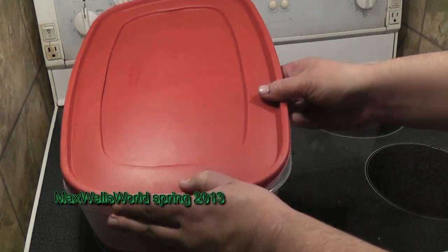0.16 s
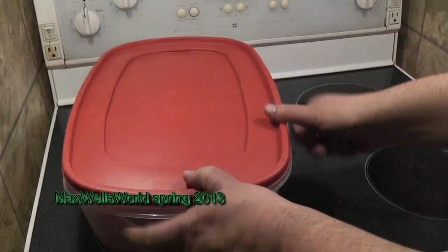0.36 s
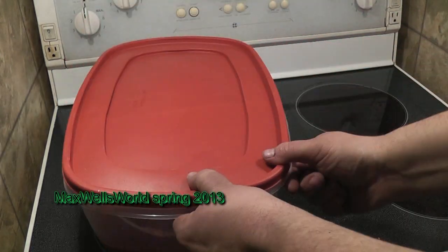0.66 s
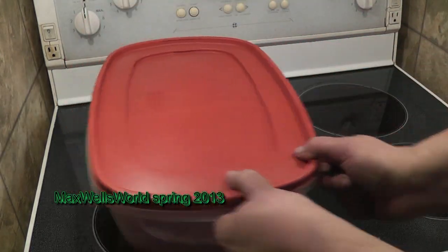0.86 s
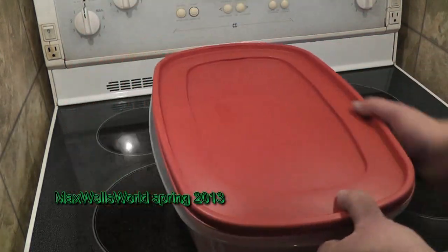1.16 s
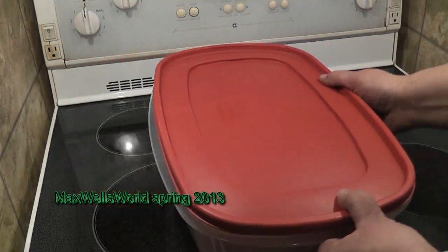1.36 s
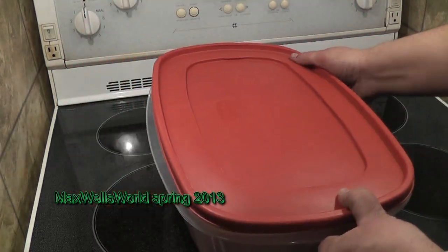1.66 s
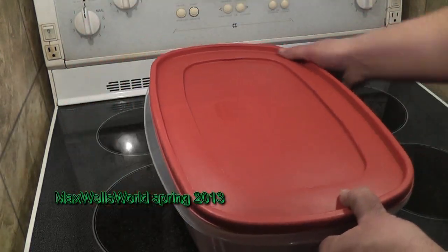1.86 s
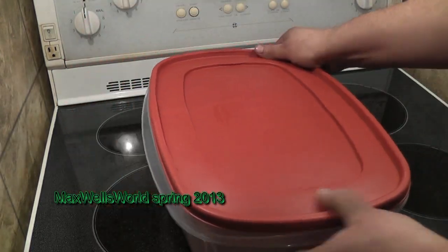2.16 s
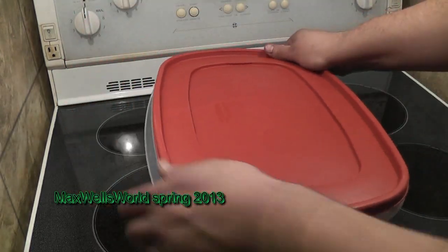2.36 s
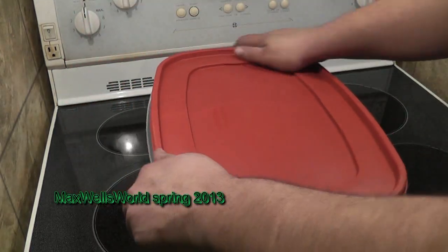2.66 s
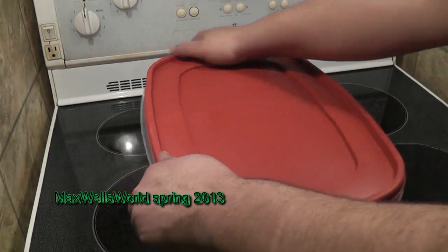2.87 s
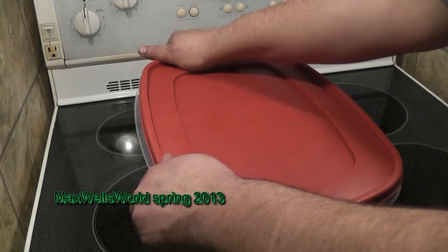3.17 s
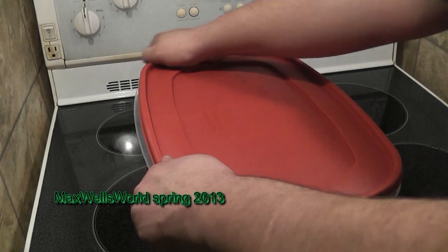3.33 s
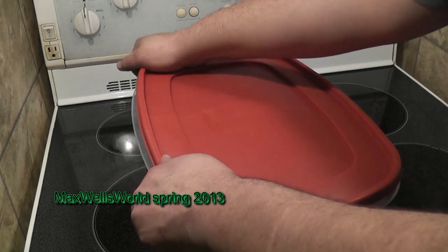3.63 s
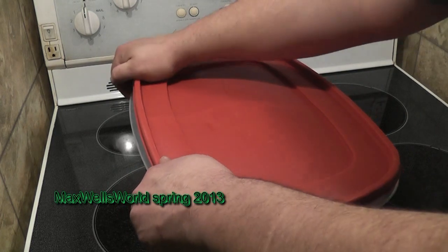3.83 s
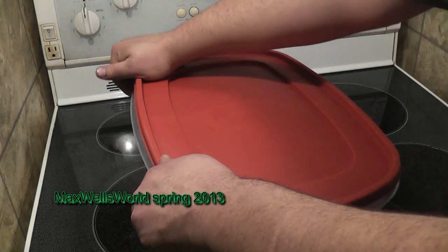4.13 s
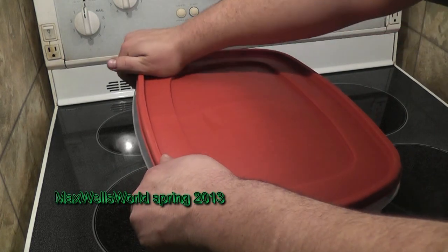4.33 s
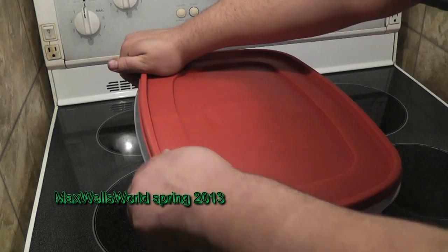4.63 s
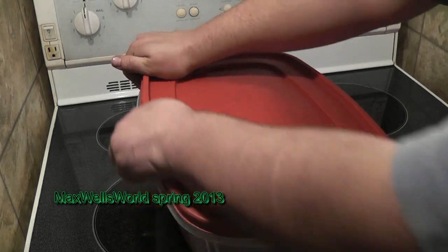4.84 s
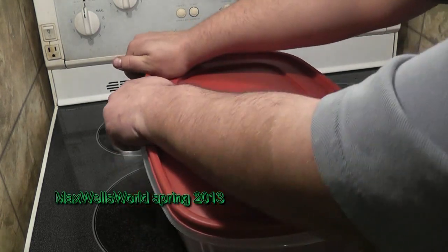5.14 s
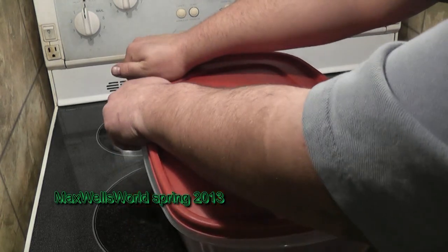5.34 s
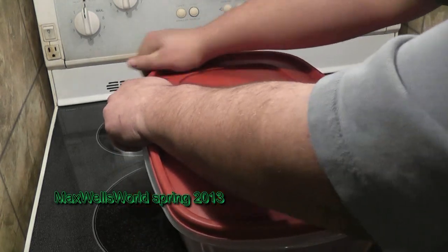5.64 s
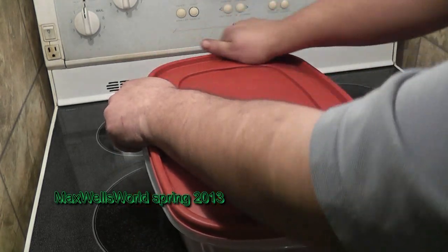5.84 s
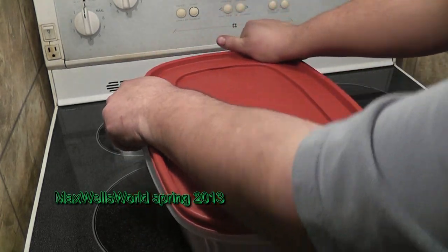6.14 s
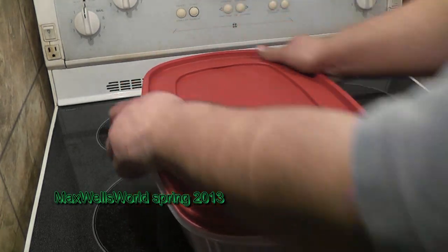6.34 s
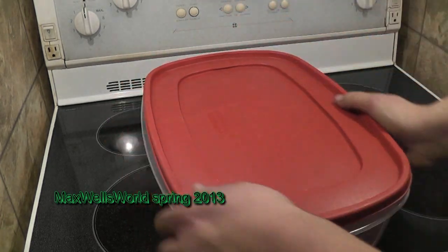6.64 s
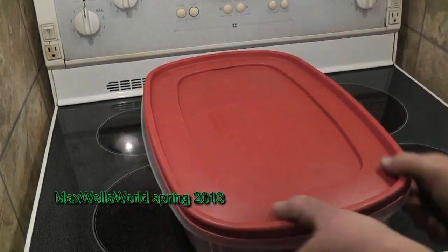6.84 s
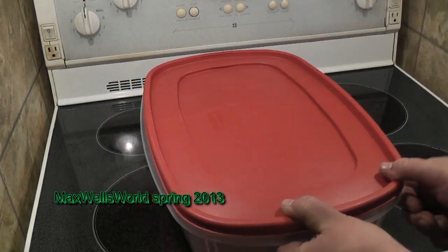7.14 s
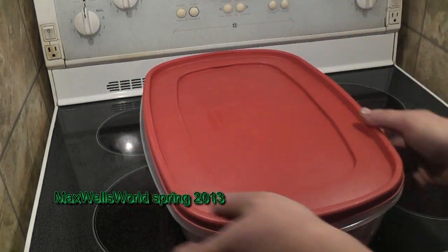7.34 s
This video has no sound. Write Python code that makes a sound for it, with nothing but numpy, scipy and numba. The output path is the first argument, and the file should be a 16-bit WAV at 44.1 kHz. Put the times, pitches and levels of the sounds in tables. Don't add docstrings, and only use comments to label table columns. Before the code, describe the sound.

Hands press a soft plastic lid onto a food box, with hollow thumps, sharp seal snaps and patchy finger rubbing in a small kitchen.

```python
import sys
import numpy as np
from scipy import signal
from scipy.fft import rfft, irfft, next_fast_len
from scipy.io import wavfile
from scipy.ndimage import uniform_filter1d
from numba import njit

SR = 44100
rng = np.random.default_rng(int(sys.argv[2]) if len(sys.argv) > 2 else 0)


def master(y):
    cut = np.clip(np.atleast_2d(y).T, -1, 1)
    pcm = np.round(cut * 32767)
    wavfile.write(sys.argv[1], SR, pcm.astype(np.int16))


def rack_gain(trim_db):
    fader = np.asarray(trim_db, float)
    return 10 ** (fader / 20)


N = 330655
T = np.arange(N) / SR

# pitch_hz [Hz], density_db [dB per Hz]
KITCHEN_HUM = [(12, -39), (20, 1), (328, 1.5), (1120, -6.5), (1400, -1), (1860, -10), (2460, -10),
               (7000, -18.5), (16000, -35)]
# pitch_hz [Hz], t60_s [s], level_db [dB]
ROOM_DECAY = [(101, 0.28, -3.5), (388, 0.3, -6), (1480, 0.25, -10), (3650, 0.5, -9), (11700, 0.14, -17.5)]
# pitch_hz [Hz], width_hz [Hz], depth [0-1]
HOB_BOUNCE = (2520, 115, 0.46)
# pitch_hz [Hz], level_db [dB]
PORTS_FROM_WALLS = [(50, -13), (250, -19), (700, -9.5), (1300, -13.5), (2400, -18), (4000, -27.5)]
# pitch_hz [Hz], level_db [dB]
PORTS_FROM_BODY = [(2000, -13), (4400, -20.5), (8000, -30), (11000, -12.5), (15000, -3)]
# pitch_hz [Hz], level_db [dB]
MICROPHONE = [(20, -17), (75, 0), (15700, 0), (15800, -25), (16400, -32), (16600, -60)]

# time_s [s], rumble_db [dB]
HAND_WEIGHT = [(0, -57.5), (.28, -46), (.6, -54), (.82, -57.5), (1.07, -45), (1.45, -51), (1.85, -63),
               (2.25, -49), (2.65, -52.5), (3.3, -46), (3.55, -61.5), (4.0, -49.5), (4.6, -66), (4.85, -52),
               (5.4, -52), (5.75, -58.5), (6.4, -55), (7.5, -61)]
# pitch_hz [Hz], width_hz [Hz], level_db [dB]
RUMBLE_MODES = [(127, 150, -2), (210, 43, -1.5), (236.2, 16, 0.5), (304.5, 20, -3.5), (343, 21, -34)]
# fastest_s [s], rise_s [s], fall_s [s], scrape_db [dB], drag_db [dB re scrape]
BOX_SLIDES = [(.33, 0.2, 0.27, -49, -25), (.62, 0.1, 0.26, -60.5, -6), (.98, 0.14, 0.26, -38.5, -2.5),
              (1.0, 0.019, .04, -36.5, -5), (1.09, .012, .06, -36.5, -9), (1.13, 0.17, 0.066, -39, -7),
              (1.5, 0.033, 0.86, -60, -1), (2.72, 0.27, 0.22, -48.5, 2), (3.1, 1, 0.29, -55, 3),
              (4.88, 0.26, 0.44, -54, 11.5), (5.34, 0.16, 0.34, -44, 4), (5.7, 0.21, 0.61, -53.5, -2),
              (6.2, 0.39, 0.44, -57, -5), (6.8, 0.59, 0.38, -50.5, -2.5), (7.1, 0.041, 0.25, -55, -5),
              (7.35, 0.3, 0.17, -57, -7), (2.1, 0.65, 0.19, -58, 4), (4.3, 0.093, 0.14, -55.5, -1)]
# fastest_s [s], rise_s [s], fall_s [s], skin_db [dB], rim_db [dB re skin]
FINGER_STROKES = [(.22, 0.15, 0.34, -47, -3.5), (.54, 0.2, 0.27, -47.5, -5), (.99, 0.19, 0.42, -44, 1.5),
                  (1.26, 0.25, 0.25, -39.5, -4), (1.51, 0.016, 0.056, -64.5, 10),
                  (1.63, 0.096, 0.2, -40.5, -5.5), (1.95, 0.1, 0.35, -42.5, -5),
                  (2.3, 0.095, 0.22, -37.5, -9.5), (2.44, 0.16, 0.51, -48.5, 1.5),
                  (2.86, 0.22, 0.17, -38, -2.5), (3.08, 0.17, 0.29, -45, -1), (3.44, 0.18, 0.13, -45, -0.5),
                  (3.86, 0.067, 0.065, -37, -3), (3.66, 0.18, 0.23, -61, -6), (4.13, .12, 0.23, -65.5, -4),
                  (4.6, .1, .12, -63.5, -6), (5.33, .03, 0.17, -47.5, -4), (5.19, .03, 0.071, -59, -3),
                  (.35, 0.022, 0.029, -50, -2), (.385, 0.022, 0.031, -54, -1),
                  (3.97, .05, 0.16, -58.5, -13), (4.32, 0.12, 0.13, -47.5, -1),
                  (4.92, 0.28, 0.28, -32, -4.5), (5.85, 0.23, 0.14, -36.5, -3),
                  (6.01, 0.37, 0.067, -43.5, -0.5), (6.22, 0.18, 0.13, -54, -0.5),
                  (6.37, 0.12, 0.13, -36, -2), (6.54, 0.35, 0.28, -32, -4.5), (6.86, 0.63, 0.23, -40.5, -4),
                  (7.17, 0.081, 0.089, -59, -3), (7.33, 0.16, 0.31, -48.5, -7)]
# pitch_hz [Hz], density_db [dB per Hz]
SKIN_HISS = [(2650, -30), (4500, -3), (8030, -5.5), (10900, -4.5), (13200, -9), (15200, -12), (16000, -18)]
# time_s [s], pitch_hz [Hz]
RIM_PITCH = [(0, 3450), (1.0, 3270), (1.3, 3660), (2.0, 3920), (2.45, 3580), (2.85, 3460), (3.45, 3600),
             (3.86, 3800), (4.75, 2780), (4.9, 2900), (5.02, 3450), (5.72, 3350), (5.85, 2920), (6.0, 3670),
             (6.33, 3070), (6.6, 3300), (6.95, 3470), (7.5, 3420)]
# time_s [s], pitch_hz [Hz], level_db [dB]
FINGER_SQUEAK = [
    (2.29, 5580, -65),
    (2.295, 6200, -29.5),
    (2.309, 6900, -34),
    (2.316, 6700, -33),
    (2.322, 6700, -62),
]

# pitch_ratio [1], level_db [dB], t60_share [1]
LID_MODES = [(.87, -17, 1), (1.27, -5, 0.48), (1.45, -22, .6)]
# pitch_hz [Hz], width_hz [Hz], level_db [dB]
WALL_MODES = [(390, 210, 4.5), (455, 27, -1.5), (532, 44, 3), (632, 35, 1), (794, 42, 0.5), (970, 200, -51)]
# start_s [s], peak_db [dB], lid_hz [Hz], box_air_db [dB], wall_db [dB]
FIRM_PUSHES = [(0.07, -30, 297, -46, -38.5), (0.148, -33.5, 314, -57, -45), (0.181, -28, 343, -51, -30),
               (0.439, -37, 250, -55, -37), (0.448, -12, 244.7, -43, -27), (0.4714, -22, 246, -52, -27),
               (0.53, -19.5, 240, -45, -28), (2.115, -17, 245, -33, -21.5), (2.562, -30, 215, -42, -35),
               (3.172, -28, 217, -53, -34), (3.2, -27, 211, -62, -38), (5.439, -30.5, 287.5, -52, -41),
               (5.478, -29.5, 254, -37, -36), (7.043, -34, 255, -60, -40), (7.056, -22.5, 310, -60, -34),
               (7.03, -40, 250, -60, -43), (7.062, -23, 210, -55, -38)]
# start_s [s], peak_db [dB], lid_hz [Hz], box_air_db [dB], wall_db [dB]
PALM_PRESSES = [(0.189, -24, 310, -49, -25.5), (0.196, -12.5, 323, -39, -17.5), (0.204, -18, 255, -50, -29),
                (0.214, -24, 249, -52, -28), (0.235, -29, 300, -55, -38), (2.589, -23, 295, -50, -44),
                (2.594, -14.5, 309, -32.5, -23), (2.659, -14.5, 240, -52, -30),
                (2.665, -17.5, 300, -34, -22), (2.687, -19, 215, -50, -26.5), (3.635, -41, 295, -64, -39.5),
                (3.823, -27.5, 237, -52, -43), (3.877, -25.5, 282, -41.5, -25),
                (4.001, -26, 210, -48, -28.5), (5.171, -19, 228, -30.5, -28), (5.217, -27, 312, -48, -27.5),
                (5.277, -26.5, 237, -37, -29.5), (5.31, -18, 343, -31, -24), (5.3938, -18, 293, -28.5, -19),
                (7.058, -18.5, 285, -22, -33)]
# start_s [s], peak_db [dB], lid_hz [Hz], wall_db [dB]
LIGHT_TAPS = [(0.338, -35, 314, -43), (1.083, -38, 226, -26), (1.161, -33, 239, -35),
              (1.282, -31.5, 220, -32), (1.309, -38, 238, -35), (1.363, -30.5, 278, -29.5),
              (1.585, -37.5, 226, -41.5), (1.728, -29, 265, -35), (1.766, -34.5, 236, -54),
              (1.901, -37.5, 240, -44.5), (2.015, -32, 235, -31.5), (2.277, -34, 286, -40),
              (2.302, -25.5, 244, -28.5), (2.376, -32, 230, -37.5), (2.399, -26, 228, -53),
              (2.434, -50, 234, -64), (2.517, -35, 210, -41.5), (2.988, -46, 210, -59),
              (3.26, -42, 228, -51), (3.392, -34.5, 236, -33), (3.665, -42, 238, -42),
              (4.226, -40, 210, -42), (4.291, -39.5, 262, -59), (5.74, -48, 204, -58),
              (6.19, -39, 305, -48), (6.27, -40, 202, -58), (6.371, -47, 199, -55), (6.54, -44, 222, -44),
              (6.589, -38, 230, -38.5), (6.778, -35.5, 230, -60), (6.87, -47, 217, -56),
              (7.279, -43.5, 248, -57), (7.347, -40, 245, -39)]

# pitch_hz [Hz], width_hz [Hz], level_db [dB]
LIP_MODES = [(1004, 280, -0.5), (1383, 175, 0), (1710, 290, -1.5), (1966, 250, -3.5), (2285, 270, -4)]
# start_s [s], peak_db [dB], ring_hz [Hz], lip_db [dB], air_db [dB]
SEAL_SNAPS = [(0.0698, -30, 3040, -33.5, -29), (0.1995, -28, 3460, -32, -56),
              (0.4447, -18.5, 3700, -25, -19.5), (0.467, -22.5, 5330, -25.5, -22),
              (2.1119, -42, 3370, -33.5, -32), (2.593, -17, 3420, -16.5, -34), (2.663, -15, 3300, -24, -20),
              (3.874, -33, 2410, -25.5, -35), (3.9955, -36, 3480, -26.5, -60),
              (5.2156, -14, 4450, -18.5, -22), (5.274, -16, 2720, -22.5, -21.5),
              (5.3078, -15.5, 3300, -18.5, -16), (5.3947, -14, 2600, -47, -17.5),
              (7.053, -23, 2530, -24, -43), (7.3471, -31.5, 5350, -39, -49)]
# start_s [s], peak_db [dB], lip_db [dB], air_db [dB]
RIM_TICKS = [(0.184, -52, -55, -35.5), (0.195, -42, -41, -50), (0.209, -44, -32, -53),
             (0.338, -39, -52, -36), (0.345, -43, -54, -44), (0.373, -37.5, -40, -44),
             (0.436, -42, -47, -35), (0.709, -49, -54, -53), (.967, -32.5, -32, -55), (.997, -36, -31, -60),
             (1.004, -42, -32, -60), (1.0857, -39, -50, -52), (1.49, -51, -45, -54),
             (1.825, -47.5, -48, -54), (1.9005, -57, -62, -52), (2.0134, -42, -43, -48),
             (2.2825, -46, -40, -42), (2.3034, -40, -37, -43), (2.562, -48, -38.5, -52),
             (2.587, -43, -46, -58), (2.655, -34, -42, -55), (2.668, -26, -27, -30),
             (2.674, -30, -25.5, -36), (2.684, -34, -36, -44), (2.692, -40, -38, -45),
             (2.706, -41, -44, -55), (3.173, -34.5, -50, -42), (3.314, -53, -60, -48),
             (3.359, -47, -40, -51), (3.3896, -38, -59, -41), (3.8194, -44, -38, -44),
             (3.878, -41, -35, -50), (3.945, -42, -35, -51), (3.954, -39.5, -36, -46),
             (3.999, -41, -48, -59), (4.099, -61, -46, -62), (4.262, -64, -56, -43),
             (4.583, -48, -48, -44.5), (5.221, -26.5, -34, -39), (5.4, -25, -43, -42),
             (6.19, -54, -55, -55), (7.056, -37, -39, -45), (7.142, -45.5, -43, -47),
             (7.368, -43.5, -41.5, -57)]
# peak_db [dB], ring_hz [Hz], lip_db [dB], air_db [dB]
SEAL_CLICKS = [(-37, 3110, -35.5, -32), (-31, 3230, -29.5, -51), (-48, 3480, -50, -54),
               (-31.5, 3500, -29.5, -39), (-19.5, 2740, -14, -20.5), (-40.5, 3310, -44, -54)]
SEAL_CLICK_TIMES = [
    0.528,
    3.6326,
    3.6526,
    3.6614,
    5.1686,
    5.2085,
]
SEAL_CLICK_LIPS = [1.1, 1.32, 1.3, 1.33, 1.004, 1.3]


def unit(x):
    return x / np.sqrt(np.mean(x ** 2))


def peak1(x):
    return x / np.abs(x).max()


def read(table, hz, col=1):
    table = np.array(table, float)
    return np.interp(np.log(hz), np.log(table[:, 0]), table[:, col])


def colour(x, table):
    size = next_fast_len(x.shape[-1])
    hz = np.maximum(np.arange(size // 2 + 1) * SR / size, 1)
    return irfft(rfft(x, size) * rack_gain(read(table, hz)), size)[..., :x.shape[-1]]


@njit
def moving_band(x, hz, k):
    y, b, l = np.empty(len(x)), 0., 0.
    for i in range(len(x)):
        g = np.tan(np.pi * hz[i] / SR)
        v = (b + g * (x[i] - l)) / (1 + g * (g + k))
        b, l, y[i] = 2 * v - b, l + 2 * g * v, k * v
    return y


def band(x, hz, width_hz):
    g, k = np.tan(np.pi * hz / SR), width_hz / hz
    poles = [1 + g * (g + k), 2 * (g * g - 1), 1 + g * (g - k)]
    return signal.lfilter([k * g, 0, -k * g], poles, x)


def steep(x, hz, width_hz):
    return band(band(x, hz, width_hz), hz, width_hz)


def walk(rate):
    k = int(SR / rate)
    held = np.repeat(rng.standard_normal(N // k + 1), k)
    return unit(uniform_filter1d(uniform_filter1d(held, k), k)[:N])


def add(out, s, x):
    i = int(s * SR)
    out[i:i + len(x)] += x[:len(out) - i]


def fade(t, t60):
    return np.exp(-np.log(1000) * t / max(t60, .002))


def slips(scatter_db):
    sizes = np.repeat(rng.exponential(size=N // 8 + 1), 8)[:N]
    return unit(rng.standard_normal(N) * rack_gain(scatter_db * sizes))


def patchy(centres_hz, gains_db, scatter_db, patchy_db, drift, rate):
    out = 0
    for hz, db in zip(centres_hz, gains_db):
        centre = np.minimum(hz * (1 + drift * walk(9.8)), .45 * SR)
        ring = moving_band(moving_band(slips(scatter_db), centre, .4), centre, .4)
        out = out + unit(ring) * rack_gain(db + patchy_db * walk(rate))
    return unit(out)


def strokes(table):
    edge_db, roundness = 42.5, 2.485
    t = T[::100]
    power = np.zeros((2, len(t)))
    for s, rise, fall, db, second_db in table:
        away = np.where(t < s, (s - t) / max(rise, .01), (t - s) / max(fall, .01))
        shape = rack_gain(-2 * edge_db * np.minimum(away, 3) ** roundness)
        power += rack_gain(2 * np.array([[db], [db + second_db]])) * shape
    return [np.interp(T, t, np.sqrt(p)) for p in power]


def kitchen_hum():
    level_db = -56 + walk(2.14)
    return rack_gain(level_db) * unit(colour(rng.standard_normal(N), KITCHEN_HUM))


def echoes(t60_scale, length=20000):
    t, tail = T[:length], 0
    for hz in 70 * 2 ** np.arange(0, 8, .5):
        part = band(rng.standard_normal(length), hz, hz / 3) * fade(t, t60_scale * read(ROOM_DECAY, hz))
        level = np.sqrt(hz / SR / np.sum(part ** 2)) * rack_gain(read(ROOM_DECAY, hz, col=2))
        tail = tail + part * level
    return tail


def wall_reflections(near):
    shift = 1.22 * walk(3.5)
    delay = np.zeros(int(.004 * SR))
    walls = 0
    for way in (np.cos, np.sin):
        response = np.append(delay, echoes(0.94))
        walls = walls + signal.fftconvolve(near * way(shift), response)[:N]
    return walls


def smear(x, t60, table):
    tail = rng.standard_normal(16384) * fade(T[:16384], t60)
    return colour(signal.fftconvolve(x, tail / np.sqrt(np.sum(tail ** 2)))[:N], table)


def port_difference(mid):
    turn = 1.35 * walk(9.7)
    side = 0
    for way in (np.cos, np.sin):
        turned = mid * way(turn)
        side = side + smear(turned, .17, PORTS_FROM_WALLS) + smear(turned, .07, PORTS_FROM_BODY)
    drum = steep(mid, 280, 300)
    return side - drum * np.dot(side, mid) / np.dot(drum, mid)


def weight_rumble(weight_db):
    bumps = rng.standard_normal(N) * rack_gain(4.5 * walk(22))
    rumble = unit(sum(rack_gain(db) * unit(band(bumps, hz, w)) for hz, w, db in RUMBLE_MODES))
    return rumble * rack_gain(weight_db)


def box_friction(rim_gain, weight_db):
    scrape_gain, drag_gain = strokes(BOX_SLIDES)
    drag_gain = np.hypot(drag_gain, rack_gain(-8) * rim_gain)
    scrape_gain = np.hypot(scrape_gain, rack_gain(-16) * rim_gain)
    scrape_gain = np.hypot(scrape_gain, rack_gain(weight_db - 12.5))
    drag = patchy([1400, 1800, 2250], [-1.5, -.4, 0],
                  scatter_db=2.0, patchy_db=-0.5, drift=0.016, rate=73)
    scrape = patchy([360, 514, 700, 860, 1050], [-1.7, 0.35, 0.2, -1.1, -0.95],
                    scatter_db=3.0, patchy_db=2.5, drift=0.01, rate=50)
    return drag * drag_gain + scrape * scrape_gain


def finger_friction(skin_gain, rim_gain):
    top = 4800 * 1.22 ** np.arange(7)
    skin_db = read(SKIN_HISS, top) + 10 * np.log10(top)
    skin = patchy(top, skin_db, scatter_db=1.2, patchy_db=1.3, drift=.02, rate=40)
    rim_hz = np.outer([.85, 1, 1.2], np.interp(T, *np.transpose(RIM_PITCH)))
    rim = patchy(rim_hz, [-1, 0, -1], scatter_db=1.2, patchy_db=1.3, drift=.02, rate=40)
    return skin * skin_gain + rim * rim_gain


def hands():
    skin_gain, rim_gain = strokes(FINGER_STROKES)
    weight_db = np.interp(T, *np.transpose(HAND_WEIGHT))
    return weight_rumble(weight_db) + box_friction(rim_gain, weight_db) + finger_friction(skin_gain, rim_gain)


def squeak():
    s, hz, db = np.transpose(FINGER_SQUEAK)
    pitch_hz = np.interp(T, s, hz) * (1 + 0.0109 * walk(270))
    phase = 2 * np.pi * np.cumsum(pitch_hz) / SR
    return rack_gain(np.interp(T, s, db, -150, -150)) * (np.sin(phase) + 0.43 * np.sin(2 * phase))


def thump_rows():
    pushes = [(*r, 0.16, 0.36) for r in FIRM_PUSHES]
    presses = [(*r, 0.047, 1.06) for r in PALM_PRESSES]
    taps = [(s, db, hz, db - 22, wall, 0.16, 0.67) for s, db, hz, wall in LIGHT_TAPS]
    return pushes + presses + taps


def thumps():
    out, boom, t = np.zeros(N), np.zeros(N), T[:12000]
    for s, peak_db, hz, box_db, wall_db, t60, rattle in thump_rows():
        luck = rng.standard_normal((len(LID_MODES) + 1, 2))
        noise = rng.standard_normal((3, len(t)))
        bend = t - .3 * t ** 2 + .00012 * np.sin(2 * np.pi * 31 * t + 3 * luck[-1, 1])
        lid = np.cos(2 * np.pi * hz * bend + 1) * fade(t, t60)
        for (ratio, db, share), (a, b) in zip(LID_MODES, luck):
            mode = np.cos(2 * np.pi * hz * ratio * (1 + 0.059 * b) * bend)
            lid = lid + rack_gain(db + 0.74 * a) * mode * fade(t, share * t60)
        rise = np.minimum(t / 0.0023, 1)
        shove = np.sin(np.pi * np.minimum(t / 0.0013, 1)) + rattle * noise[0] * fade(t, 0.062) * rise
        lid = signal.fftconvolve(lid, shove[:4096])[:len(t)]
        knock = noise[1] * fade(t, 0.44 * t60) * rise
        wall = sum(rack_gain(db) * band(knock, f, w) for f, w, db in WALL_MODES)
        box = np.sin(2 * np.pi * 114.5 * (1 + 0.014 * luck[-1, 0]) * t)
        box = box * fade(t, .3) * (1 - np.exp(-t / 0.0036))
        hob = unit(band(noise[2], 91, 150)) * fade(t, 0.29) * (1 - np.exp(-t / 0.0051))
        start = s - .0015
        add(out, start, rack_gain(peak_db + 2.0) * (peak1(lid) + 0.01 * hob) + rack_gain(wall_db + 6.5) * peak1(wall))
        add(boom, start, rack_gain(box_db + 4.5) * box)
    return out, boom


def crack_rows():
    # ring width / pitch, crumble_db, first slip re burst [dB]
    snap_way, tick_way, click_way = (0.91, -10.5, 10.2), (0.99, -8.5, 0), (0.42, -12, 13.6)
    snaps = [(*r, 0.056, 1, snap_way) for r in SEAL_SNAPS]
    clicks = [(s, *r, 0.033, lip, click_way)
              for s, r, lip in zip(SEAL_CLICK_TIMES, SEAL_CLICKS, SEAL_CLICK_LIPS)]
    ticks = [(s, db, 3300, low, air, 0.1, 1, tick_way) for s, db, low, air in RIM_TICKS]
    return snaps + clicks + ticks


def cracks():
    out, t = np.zeros(N), T[:5000]
    lip_lag_s = .0006
    for s, peak_db, hz, low_db, air_db, t60, lip, (width, crumble_db, first_db) in crack_rows():
        decay = fade(t, 0.004) + rack_gain(crumble_db) * fade(t, t60)
        slip = rng.standard_normal((3, len(t))) * decay * np.minimum(t / 0.00087, 1)
        slip[:, 20] += rack_gain(first_db)
        ring = peak1(steep(slip[0], hz, width * hz))
        late = np.roll(slip[1], int(lip_lag_s * SR)) * (t > lip_lag_s)
        low = 0
        for k, (f, w, db) in enumerate(LIP_MODES):
            low = low + (-1) ** k * rack_gain(db) * band(late, lip * f, lip * w)
        air = peak1(steep(steep(slip[2] * fade(t, .15), 8000, 12000), 8000, 12000))
        crack = rack_gain(peak_db + 8.0) * ring + rack_gain(low_db + 5.0) * peak1(low) + rack_gain(air_db + 7.0) * air
        add(out, s, crack)
    return out


def scene():
    lid, box = thumps()
    near = hands() + cracks() + lid + squeak()
    mid = near + wall_reflections(near) + kitchen_hum()
    dip_hz, dip_width_hz, depth = HOB_BOUNCE
    mid = mid - depth * band(mid, dip_hz, dip_width_hz)
    side = port_difference(mid)
    box = steep(box, 114.5, 140)
    mid, side = mid + box, side - 0.15 * box
    return np.array([mid + side, mid - side])


def band_limit(x):
    return signal.sosfilt(signal.butter(12, 16500, fs=SR, output="sos"), x)


def record(dry):
    rounded = np.tanh(1.747 * dry) / 1.71
    return band_limit(colour(rounded, MICROPHONE))


dry = scene()
out = record(dry)
master(out)
```